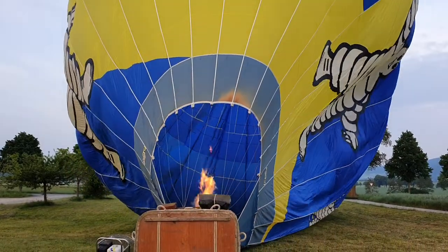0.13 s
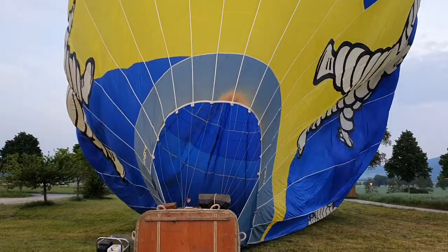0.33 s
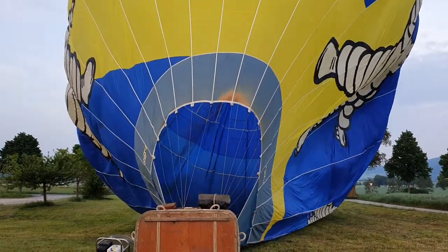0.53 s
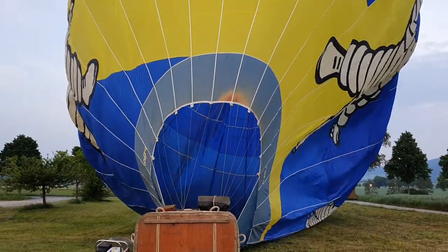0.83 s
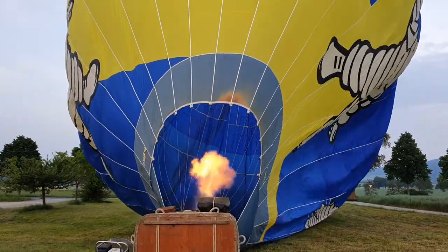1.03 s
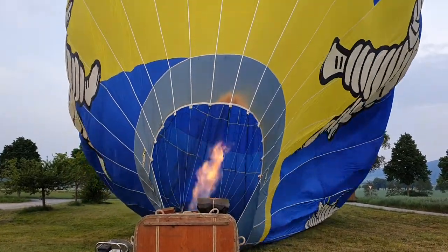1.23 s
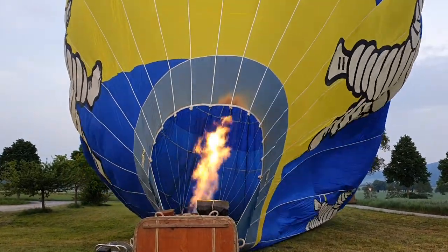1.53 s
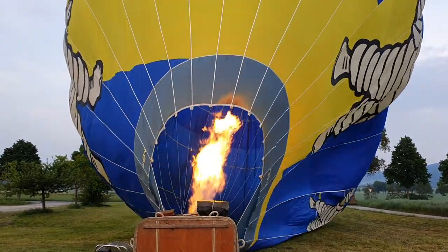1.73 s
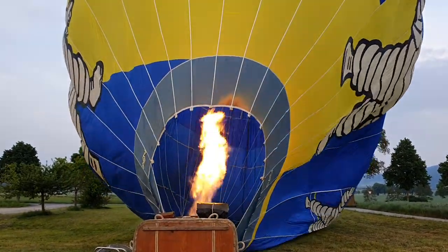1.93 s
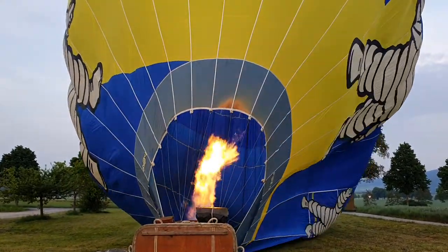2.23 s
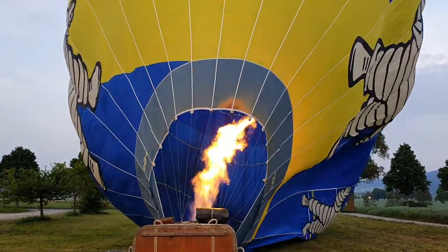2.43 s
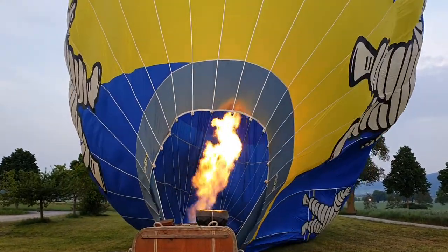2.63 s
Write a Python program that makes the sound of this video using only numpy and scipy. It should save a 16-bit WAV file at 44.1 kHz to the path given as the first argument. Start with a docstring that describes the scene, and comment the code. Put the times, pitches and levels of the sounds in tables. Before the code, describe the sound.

A hot air balloon's propane burner dies out, ticks, relights with a deep thump and keeps roaring unevenly, over a steady buzzing engine-fan drone in an open field, heard close in stereo without echo.

```python
"""A steady motor drone, then a dying burner that relights with a thump and roars: a hot air balloon being
inflated in an open field. The drone is a two-blade fan on a one-cylinder four-stroke engine: blade and exhaust
pulses, ringing metal and chopped air noise, all locked to the engine cycle. The propane burner is filtered noise
for roar and gas hiss, a valve tick and a short low tone. Two close microphone ports hear it from one side."""
import sys
import numpy as np
from scipy import signal
from scipy.fft import rfft, irfft, next_fast_len
from scipy.io import wavfile

SR = 44100
rng = np.random.default_rng(int(sys.argv[2]) if len(sys.argv) > 2 else 0)


def store_wav(level_fs):
    """Save 16-bit WAV to argv[1]."""
    pcm = np.round(np.clip(np.atleast_2d(level_fs), -1, 1) * 32767)
    wavfile.write(sys.argv[1], SR, pcm.T.astype(np.int16))


N = 122598  # length in samples

FIRING_AT = .9  # share of the two-turn engine cycle at which the cylinder fires

# gas jet strength, shared by the hiss and the mid roar [t/s, level/dB]
GAS_JET = [(0, -42), (.2, -58), (.4, -71), (.8, -71), (.88, -49.5), (1.05, -42.5), (1.6, -43), (1.7, -45.5),
           (2.1, -44), (2.78, -44)]


def amp(db):
    """dB to gain."""
    return 10 ** (np.asarray(db) / 20)


def rms_one(x):
    """Scale to rms 1."""
    return x / np.sqrt(np.mean(x ** 2) + 1e-20)


def in_time(rows):
    """A (t/s, value) curve read at every sample."""
    return np.interp(np.arange(N) / SR, *np.transpose(rows))


def at_hz(points, hz):
    """A (f/Hz, value) table read on a log frequency axis."""
    table_hz, values = np.transpose(points)
    return np.interp(np.log(hz + 1), np.log(table_hz + 1), values)


def noise_pair():
    """Two unrelated rows of white noise."""
    return rng.standard_normal((2, N))


def drift(corner_hz):
    """Random wander of spread 1: white noise through a two-pole lowpass, after a second of settling."""
    r = np.exp(-2 * np.pi * corner_hz / SR)
    wander = signal.lfilter([1], [1, -2 * r, r * r], rng.standard_normal(N + SR))
    return rms_one(wander[SR:])


def colour(x, spectrum):
    """Causal (minimum-phase) filter with the given dB spectrum; the result has rms 1."""
    size = next_fast_len(N + SR // 2)
    log_gain = np.log(amp(at_hz(spectrum, np.fft.rfftfreq(size, 1 / SR))))
    # folding the cepstrum onto positive time makes the filter causal
    cepstrum = irfft(log_gain, size)
    cepstrum[1:size // 2] *= 2
    cepstrum[size // 2:] = 0
    response = np.exp(rfft(cepstrum))
    return rms_one(irfft(rfft(x, size) * response, size)[..., :N])


def pulses(turns, count):
    """One clean pulse per whole number of turns, built from count equal harmonics."""
    return sum(np.cos(2 * np.pi * k * turns) for k in range(1, count + 1))


def ports(sound, loose, lead_share=1):
    """The left port hears the sound first; the unrelated loose sound makes the sides differ."""
    # left over right port [f/Hz, level/dB]
    balance = [(60, -0.5), (80, -0.5), (110, -1.0), (140, -1.0), (190, -1.0), (260, -2.0), (340, -3.0),
               (460, 1.5), (610, -0.5), (820, -2.5), (1100, 0.5), (1470, -2.5), (1960, -1.5), (2620, -4.5),
               (3510, -3.0), (4690, -8.5), (6270, -8.0), (8390, -4.5), (11200, -4.5), (15000, 1.0)]
    # power share of unrelated sound [f/Hz, share]
    unrelated = [(60, .0003), (500, .002), (1000, .06), (2500, .1), (5000, .18), (8000, .2), (12000, .3)]
    # how far the left port leads [f/Hz, phase/rad]
    left_lead = [(0, 0), (1120, 1.2), (1380, 0.5), (1640, 2.2), (1890, 0.9), (2500, 0.9), (2760, 1.4),
                 (3620, 1.9), (4820, 3.3), (5080, 4.8), (6980, 5.9), (8790, 8.5), (10200, 9.5),
                 (15200, 16.2)]
    hz = np.fft.rfftfreq(N, 1 / SR)
    side = np.array([[1], [-1]])  # left, right
    share = at_hz(unrelated, hz)
    mixed = np.sqrt(1 - share) * rfft(sound) + np.sqrt(share) * rfft(loose) * side
    gain = amp(side * at_hz(balance, hz) / 2)
    lead = lead_share * np.interp(hz, *np.transpose(left_lead))
    return irfft(mixed * gain * np.exp(.5j * side * lead), N)


def air_rush(chop, since_firing):
    """Air rushing through the blades: noise that swells with each blade pass and fades after each firing."""
    # colour of the rush [f/Hz, level/dB per Hz]
    air_colour = [(180, -23), (300, -7.5), (400, -14), (532, -22), (750, -12.5), (913, -12), (1080, -22),
                  (1350, -7), (1700, -9.5), (2000, -12), (2350, -14), (2650, -16), (3100, -18.5),
                  (3450, -16), (3800, -14.5), (5010, -17), (6400, -20), (7300, -23.5), (8000, -27.5),
                  (9500, -28), (10500, -25), (12000, -25.5), (13300, -30), (14000, -33), (15500, -37)]
    level_db, chop_db, fade_db = -33.5, 2, 1.2  # the fade spans one engine cycle
    rush = amp(chop_db * chop - fade_db * since_firing) * noise_pair()
    return amp(level_db) * colour(rush, [(60, -7)] + list(air_colour))


def ringing_cage(cycle, chop, since_firing):
    """Metal of the fan cage and engine: resonances driven by contact knocks and blade-chopped noise."""
    # low, middle and high groups of ringing modes [f/Hz, width/Hz, level/dB]
    modes = [
        [(1320, 400, -3)],
        [(760, 400, -5), (1940, 300, -2), (2055, 100, -3)],
        [(2620, 380, -2), (3100, 400, -10)],
    ]
    # metal contacts in each engine cycle [share of the cycle, low level/dB, middle level/dB, high level/dB]
    contacts = [(.005, -12, -14, -4), (.045, -4, -6, -14), (.135, -8, -6, -6), (.185, 0, -20, -14),
                (.24, -1, 0, 0), (.32, -5, -12, -8), (.39, -14, -8, -12), (.435, -2, -16, -14),
                (.485, -5, -2, -6), (.74, -2, -4, -10), (.77, -5, -12, -5), (.93, -2, -7, -8),
                (.98, -6, -1, -12)]
    level_db, knock_db, knock_spread_db = -33.5, 11, .5
    chop_db, rise_db = 10.5, 1  # the buzz rises over the cycle from one firing to the next

    knocks = 0
    for at, *group_db in contacts:
        strike = np.diff(np.floor(cycle - at), prepend=9) > 0  # one sample per engine cycle
        knocks = knocks + amp(group_db)[:, None, None] * strike
    knocks = knocks * amp(knock_spread_db * noise_pair())
    buzz = amp(chop_db * chop + rise_db * since_firing) * noise_pair()
    drives = amp(knock_db) * rms_one(knocks) + buzz

    cage, sign = 0, 1
    for drive, group in zip(drives, modes):
        for hz, width_hz, mode_db in group:
            r = np.exp(-np.pi * width_hz / SR)
            section = [1, 0, -1, 1, -2 * r * np.cos(2 * np.pi * hz / SR), r * r]
            ringing = rms_one(signal.sosfilt([section, section], drive))
            cage = cage + sign * amp(mode_db) * ringing
            sign = -sign  # neighbouring modes in opposite polarity
    return amp(level_db) * rms_one(cage)


def exhaust(cycle):
    """Each firing sends one pressure pulse out of the exhaust, once per two-turn cycle."""
    # pulse colour [f/Hz, level/dB]
    pulse_colour = [(17, -44), (50, -2), (86, 12), (105, -5), (125, 1), (165, -2.5), (190, -12), (230, 5.5),
                    (275, -12.5), (320, -2.5), (560, -38), (650, -14), (800, -31.5), (950, -9.5),
                    (1030, -17.5)]
    return amp(-34.5) * colour(pulses(cycle - FIRING_AT, count=60), pulse_colour)


def blade_tone(cycle, passes, blade_hz):
    """Each passing blade pushes a pressure pulse; scattered timing and the engine's surge bend the tone."""
    # strength of the blade harmonics [multiple of blade rate, level/dB]
    orders = [(1, -1), (2, -17), (3, -3.5), (4, -2.5), (5, -12.5), (6, -20), (7, -18.5), (8, -21.5),
              (9, -20), (10, -15), (11, -16.5), (12, -18.5), (13, -14), (14, -22), (15, -30), (16, -32),
              (17, -27)]
    level_db, waver_db, waver_hz = -22, .25, 6
    jitter, jitter_hz = .003, 25  # timing scatter as share of a blade pass
    surge, surge_at = .0088, .24  # each firing hurries the blades: share of a pass, share of the cycle
    tone_colour = [(26.0, -48.0)] + [(k * blade_hz, db) for k, db in orders]
    hurry = surge * np.cos(2 * np.pi * (cycle - surge_at))
    timing = passes + hurry + jitter * drift(jitter_hz)
    level = amp(level_db + waver_db * drift(waver_hz))
    return -level * colour(pulses(timing, count=17), tone_colour)


def fan():
    """Engine speed sets the cycle, and four blade passes per cycle lock all the fan sounds together."""
    # engine speed [t/s, speed/rpm]
    speed = [(0.0, 2055.2), (0.31, 2070.3), (0.62, 2061.9), (0.93, 2071.1), (1.24, 2070.8), (1.54, 2065.4),
             (1.85, 2054.4), (2.16, 2060.4), (2.47, 2070.5), (2.78, 2069.6)]
    blade_at = .975  # first blade pass, as share of the engine cycle
    chop_late, chop_sharp = .011, 3.5  # delay as share of a blade pass; exponent narrowing the swell
    rpm = in_time(speed)
    cycle = np.cumsum(rpm / 120) / SR  # two turns per cycle
    since_firing = (cycle - FIRING_AT) % 1
    passes = 4 * (cycle - blade_at)
    chop = (np.cos(np.pi * (passes - chop_late)) ** 2) ** chop_sharp
    noise, loose = ringing_cage(cycle, chop, since_firing) + air_rush(chop, since_firing)
    pulsed = blade_tone(cycle, passes, np.mean(rpm) / 30) + exhaust(cycle)
    return ports(pulsed + noise, loose)


def valve():
    """A faint bright tick as the gas valve opens: a decaying noise burst through a narrow band."""
    start_s, level_db, centre_hz, t60_s = .769, -29, 12500, .012
    t = np.arange(N) / SR - start_s
    burst = (t > 0) * amp(-60 * np.maximum(t, 0) / t60_s) * rng.standard_normal(N)
    band = signal.butter(2, [centre_hz * .85, centre_hz * 1.15], "band", fs=SR, output="sos")
    return amp(level_db) * signal.sosfilt(band, burst + 1e-18)


def gas_hiss():
    """Thin hiss of the gas jet: bright noise that follows the jet strength with a slight flutter."""
    # hiss colour [f/Hz, level/dB per Hz]
    hiss_colour = [(1500, -21), (3500, 15.5), (6000, -6), (9000, -0.5), (12000, 5.5), (14000, -8),
                   (15500, -7)]
    flutter_db = .3 * drift(25)
    return amp(in_time(GAS_JET) + flutter_db) * colour(noise_pair(), hiss_colour)


def relight_thump():
    """The gas catches: a low tone that swells fast and dies away."""
    centre_s, level_db, hz, t60_s, rise_s = .872, 3, 105, .06, .005
    t = np.arange(N) / SR - centre_s
    before = np.exp(np.minimum(-t / rise_s, 99))
    after = amp(np.minimum(60 * t / t60_s, 400))
    swell = 1 / (before + after)  # one half at the centre
    return amp(level_db) * swell * np.cos(2 * np.pi * hz * t)


def flame_roar():
    """Fluttering low roar that grows with the flame, and a mid roar that follows the burning jet."""
    # size of the flame, as low roar level [t/s, level/dB]
    flame = [(0, -16.5), (.08, -22.5), (.2, -22), (.26, -22.5), (.31, -35), (.855, -78), (.885, -11.5),
             (.95, -17.5), (1.1, -16.5), (1.3, -16), (1.52, -19.5), (1.66, -15.5), (1.73, -19), (1.79, -17),
             (1.86, -17.5), (1.95, -14), (2.03, -18.5), (2.22, -16.5), (2.32, -20.5), (2.44, -14),
             (2.52, -22), (2.58, -18), (2.78, -17.5)]
    # low roar colour [f/Hz, level/dB per Hz]
    roar_colour = [(12, -62), (25, -32), (40, -11), (55, -2), (75, 0), (110, -3), (160, -6), (240, -15),
                   (330, -21), (420, -28), (700, -34), (1100, -44), (3000, -56), (9000, -90)]
    # mid roar colour [f/Hz, level/dB per Hz]
    body_colour = [(200, -22), (330, -13), (420, -8.5), (550, -1), (700, -5.5), (900, -19.5), (1200, -28.5),
                   (3000, -30.5)]
    body_db = 11.5  # above the jet strength
    flutter_db = .7 * drift(13.3)
    low = amp(in_time(flame) + flutter_db) * colour(noise_pair(), roar_colour)
    mid = amp(in_time(GAS_JET) + body_db) * colour(noise_pair(), body_colour)
    return low + mid


def burner():
    """Roar and thump come from nearer the middle, so they lead less at the left than hiss and valve."""
    roar, loose_roar = flame_roar()
    hiss, loose_hiss = gas_hiss()
    fire = ports(roar + relight_thump(), loose_roar, lead_share=.4)
    return fire + ports(hiss + valve(), loose_hiss)


def scene():
    """Fan and burner add up at the two ports."""
    return fan() + burner()


def record(dry):
    """A steep elliptic lowpass cuts the top."""
    lowpass = signal.ellip(16, .3, 90, 15730, fs=SR, output="sos")  # ripple dB, stopband dB, cutoff Hz
    return signal.sosfilt(lowpass, dry)


dry = scene()
out = record(dry)
store_wav(out)
```